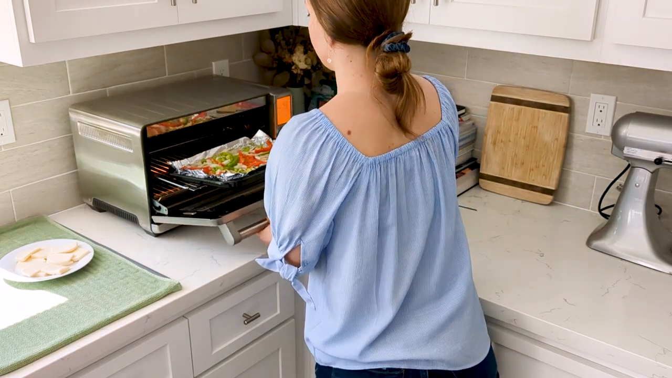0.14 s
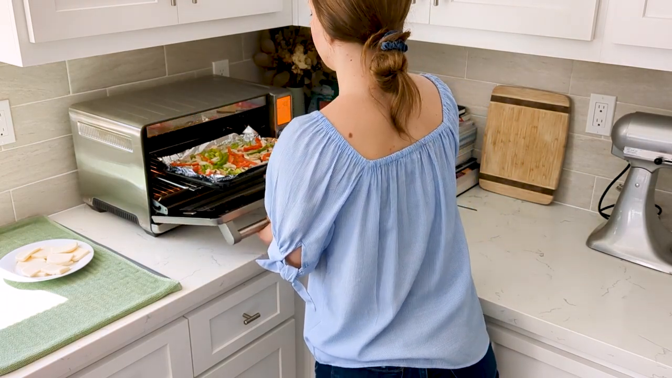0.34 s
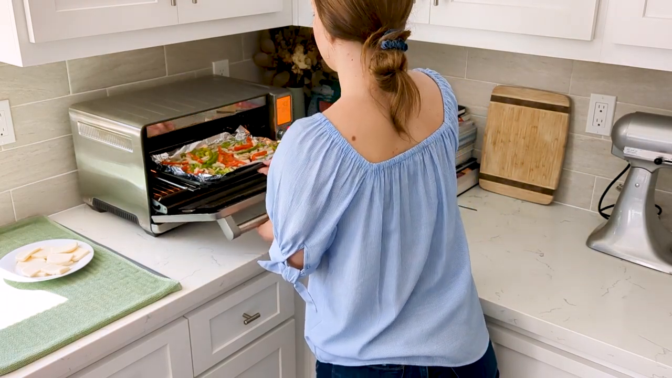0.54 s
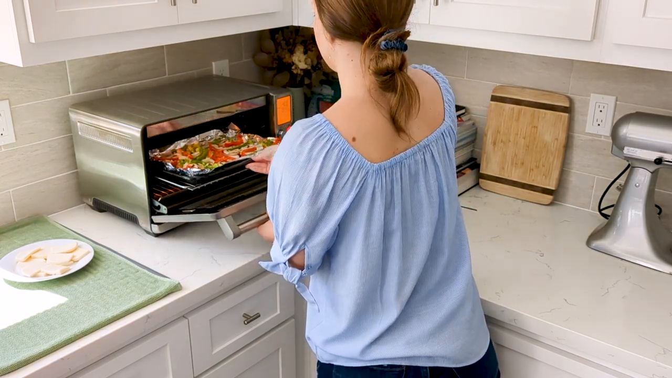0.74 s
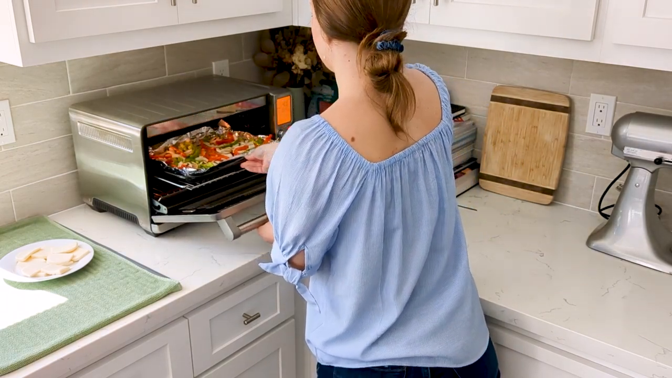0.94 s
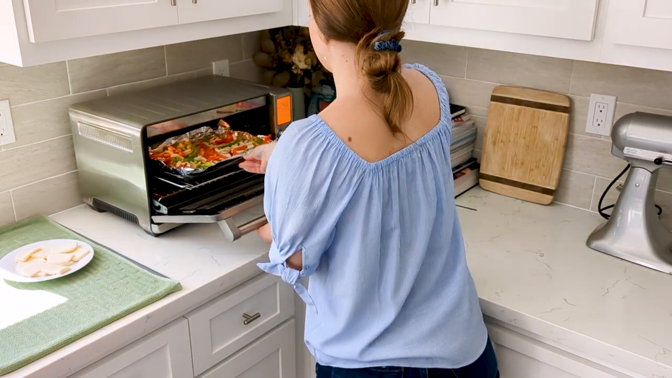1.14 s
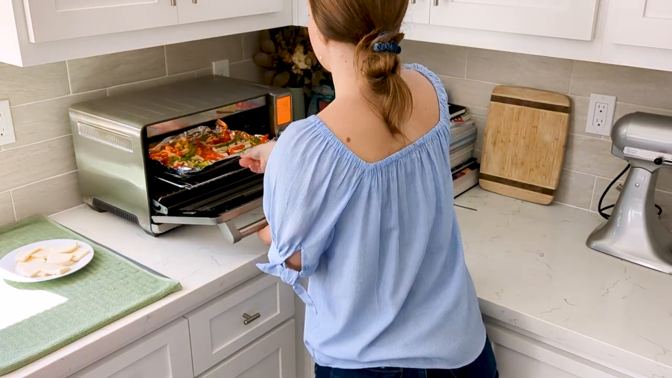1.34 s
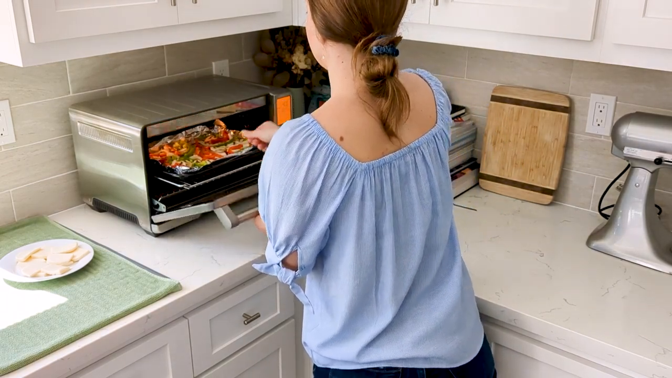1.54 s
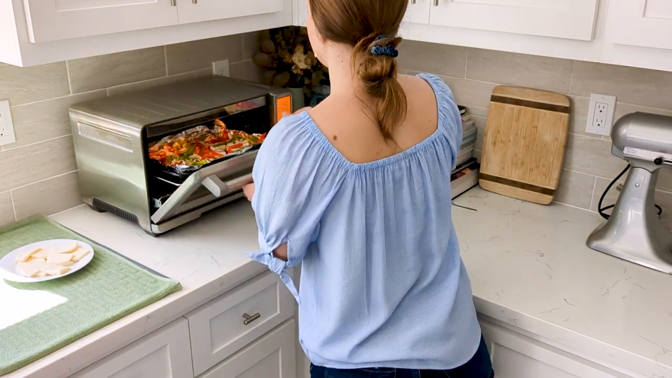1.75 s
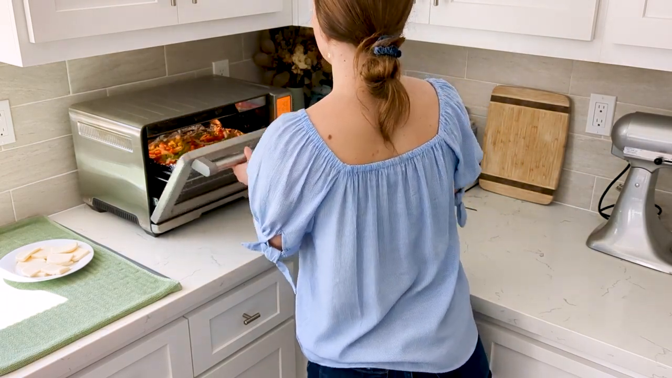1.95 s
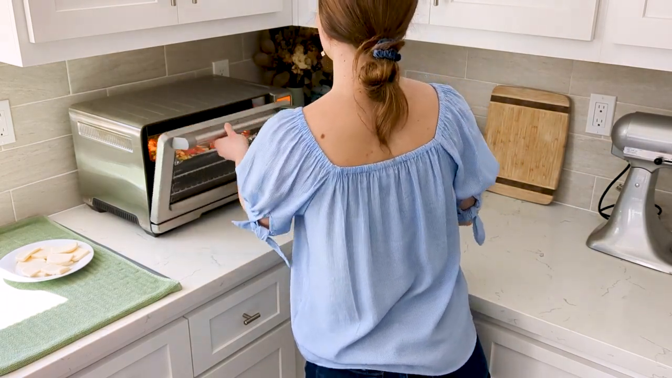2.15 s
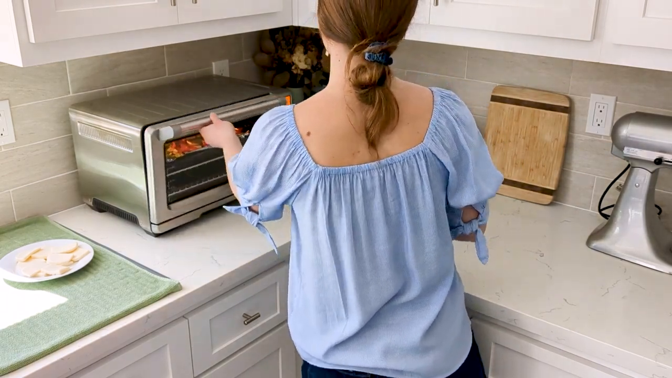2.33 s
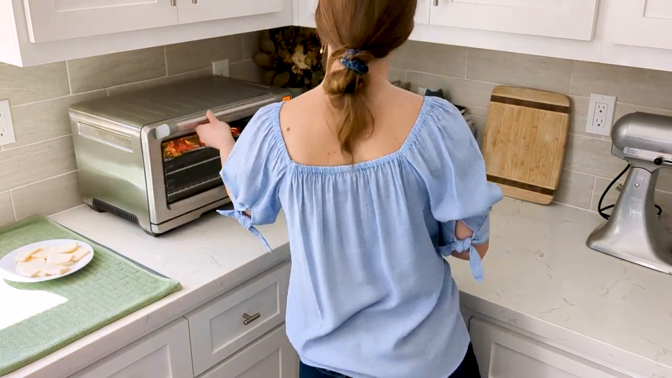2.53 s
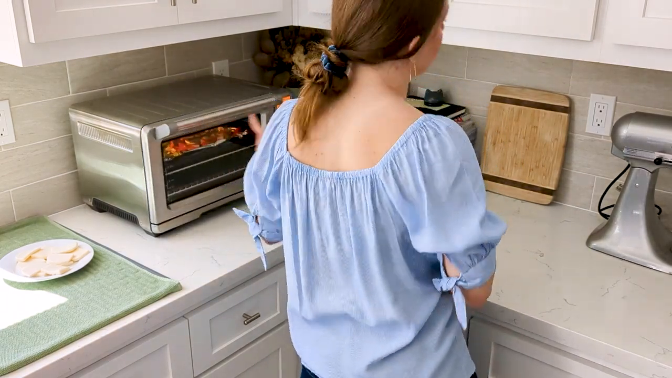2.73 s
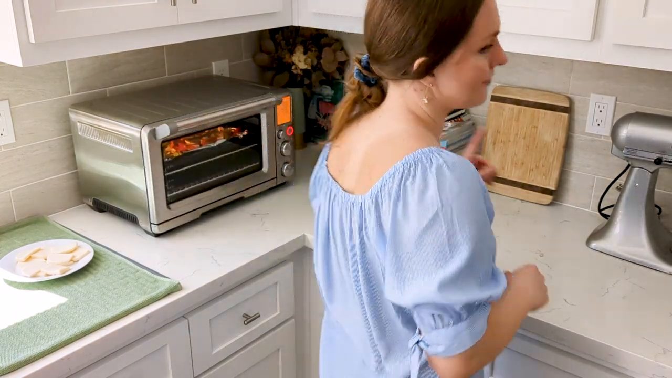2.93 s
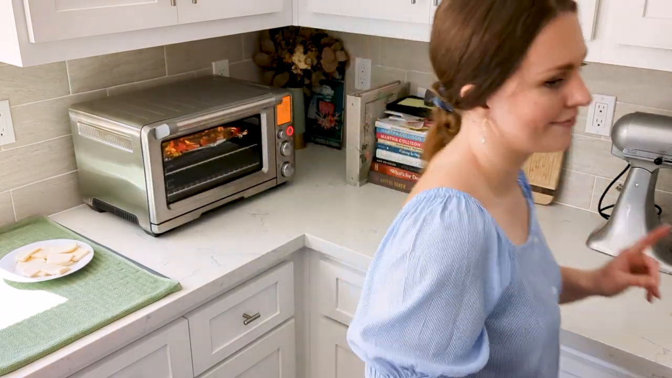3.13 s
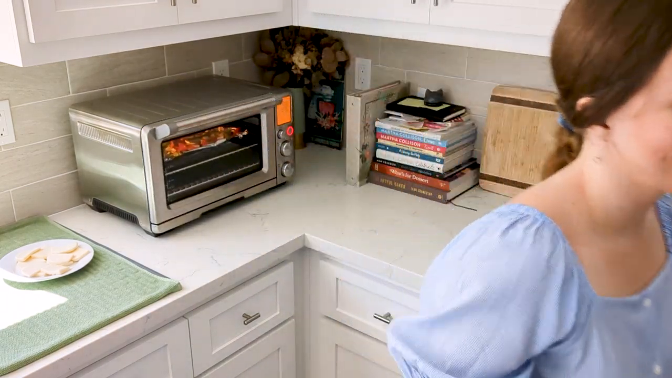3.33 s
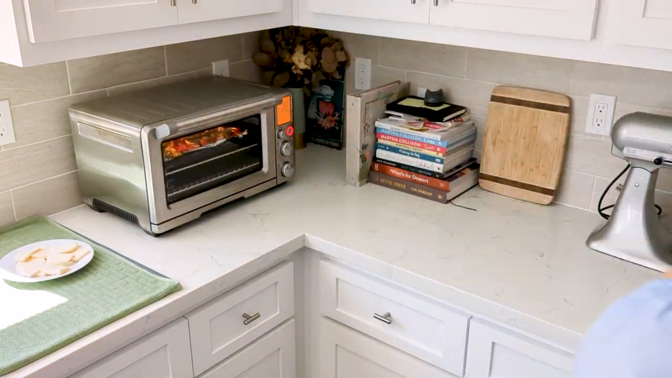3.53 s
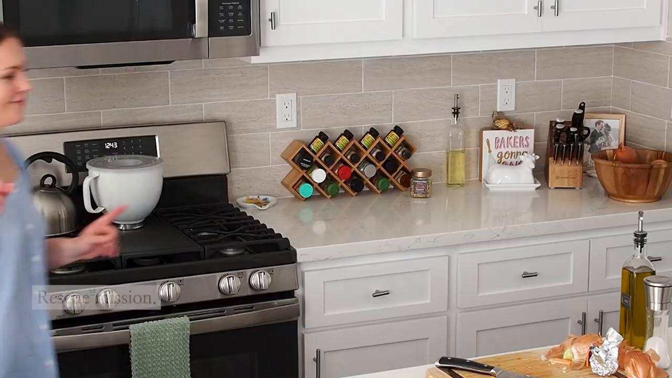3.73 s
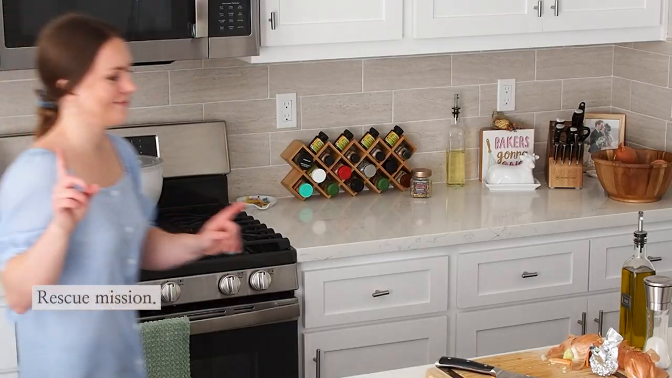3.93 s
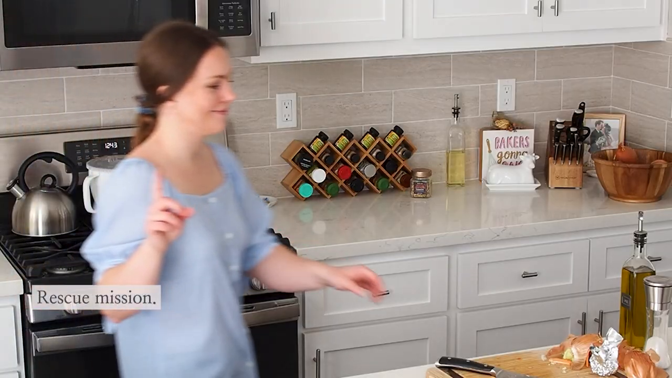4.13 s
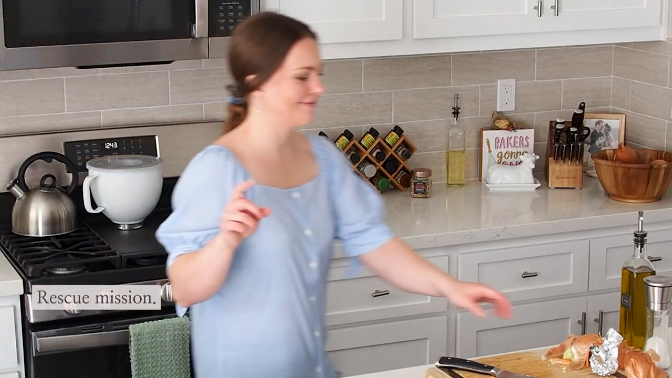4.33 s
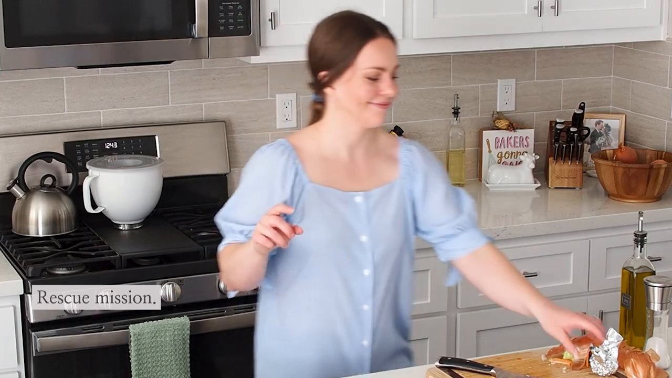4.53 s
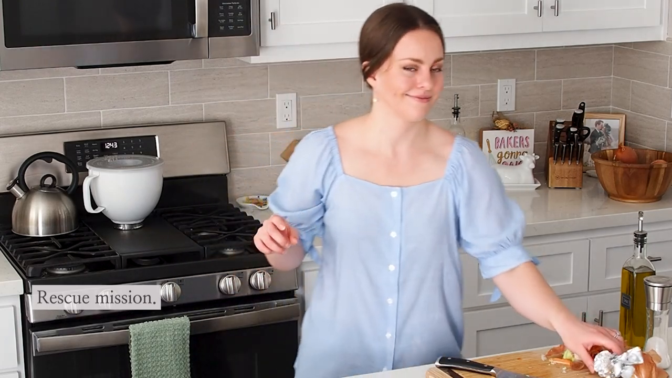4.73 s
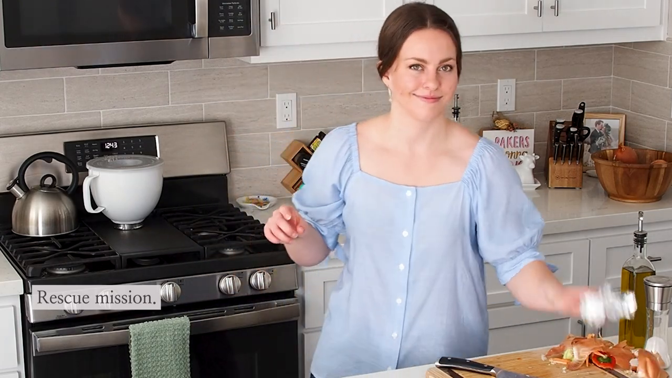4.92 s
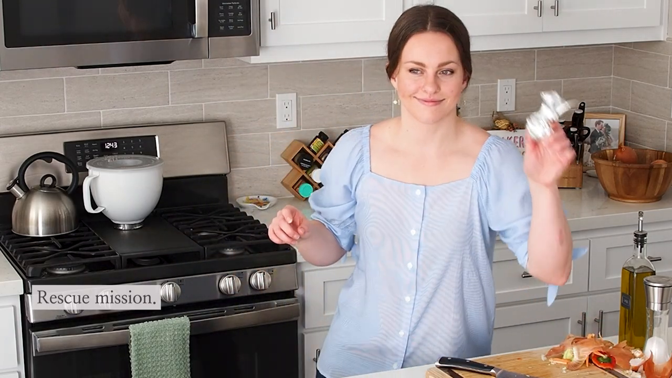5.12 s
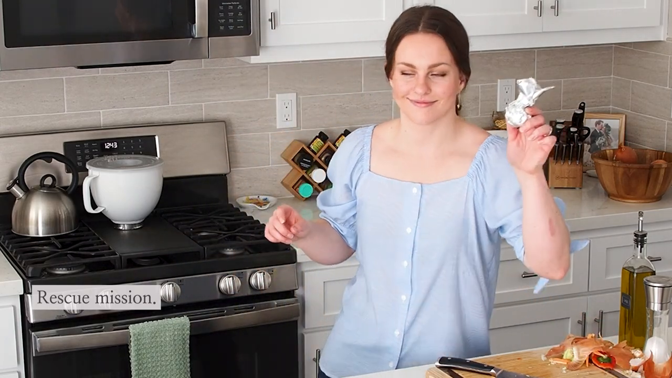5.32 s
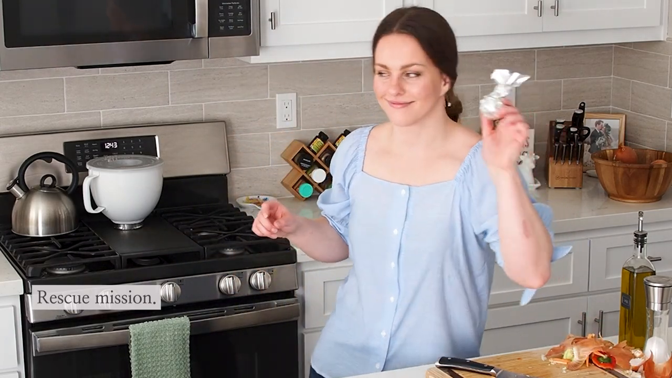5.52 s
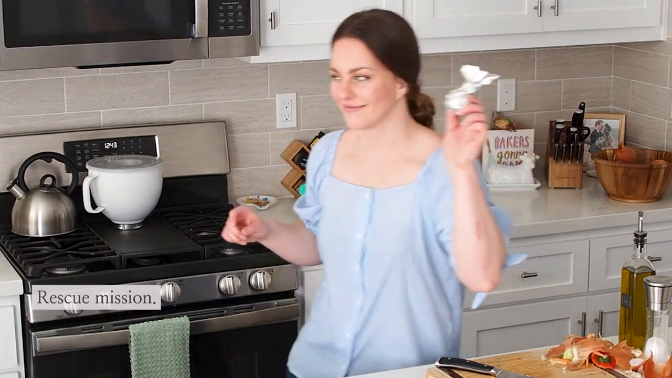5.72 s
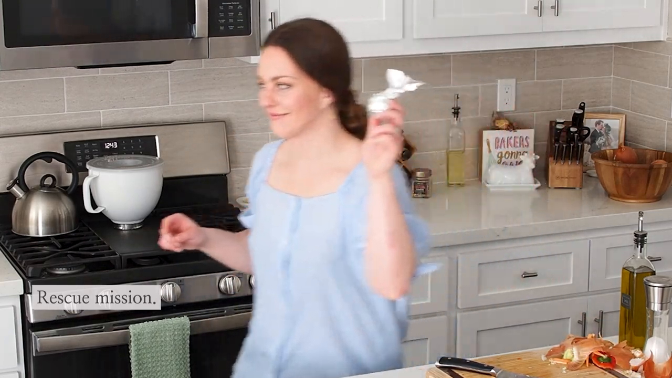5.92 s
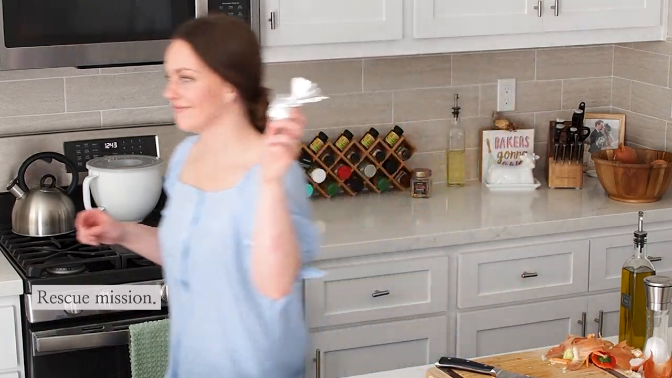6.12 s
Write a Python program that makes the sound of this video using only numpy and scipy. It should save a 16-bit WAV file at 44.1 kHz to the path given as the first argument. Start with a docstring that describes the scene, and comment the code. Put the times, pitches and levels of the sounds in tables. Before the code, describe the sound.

In a small tiled kitchen, a thin metal pan clatters and slides over oven wires near the microphone for about a second. Next the toaster oven door clanks, its hinge stutters, and it closes with a hollow thump. The rest is much quieter: low room rumble and a fan hum step up slightly, with soft swishes of cloth, a few crisp foil crackles and a dull low thud.

```python
"""Close by, a foil-lined sheet pan knocks and scrapes onto the wire rack of a toaster oven, and both ring.
The sprung door lets go with a clank, judders on its way up and shuts with a tick and a cabinet thump.
Then the microphone is by the humming stove: a sleeve rustles and a foil-wrapped lump is picked off a
board with small snaps. Behind it lie room rumble, a fan's drone and the brief echo of a tiled kitchen."""
import sys
import numpy as np
from scipy import signal
from scipy.fft import rfft, irfft, next_fast_len
from scipy.io import wavfile

SR = 44100
rng = np.random.default_rng(int(sys.argv[2]) if len(sys.argv) > 2 else 0)


def master_out(mix):
    """Clip the mix to full scale and print it as 16-bit PCM to the path in sys.argv[1]."""
    frames = np.transpose(np.atleast_2d(mix))
    ceiling = np.clip(frames, -1, 1)
    pcm = np.round(ceiling * 32767).astype(np.int16)
    wavfile.write(sys.argv[1], SR, pcm)


N = 271920
T = np.arange(N) / SR

# Levels in the tables are relative, within each layer.
# room tone by the oven and by the stove: f/Hz, level/dB
OVEN_AIR = [(12, -50), (20, 5.5), (60, -12.5), (146, -7), (177, -17), (328, -16), (434, -18.5),
            (472, -15.5), (738, -21.5), (1000, -22), (1260, -22.5), (6910, -38), (16000, -43.5)]
STOVE_AIR = [(12, -81), (20, 5), (96, -10), (146, -19.5), (177, -13.5), (337, -18.5), (485, -14),
             (738, -20.5), (1000, -17), (1290, -22.5), (1760, -22), (2600, -29.5), (16000, -44)]
# fan resonances: f/Hz, width/Hz, level by the oven/dB, level by the stove/dB
FAN_DRONE = [(138.8, 5.8, -62, -58), (336.8, 28, -64.5, -58), (486.7, 22, -67, -60.5),
             (582, 26, -69.5, -65), (1016.6, 34, -66, -59.5), (1134, 86, -66.5, -62)]
# thuds of the settling pan, the door's weight and footfalls: t/s, level/dB, length/s
THUDS = [(1.022, -42, 0.14), (2.205, -36.5, 0.088), (4.728, -42, 0.21), (5.58, -52, .1)]
# their spectrum: f/Hz, level/dB
THUD_TONE = [(20, -8), (60, 16.5), (120, 3), (220, 8), (600, -36)]

# swishes of sleeve and foil: peak t/s, level/dB, fading time/s, treble/dB
SWISHES = [(3.08, -66, 0.15, 1), (3.83, -54.5, 0.22, -3.5), (4.10, -49.5, 0.14, -4.5),
           (4.29, -47, 0.097, -6.5), (4.49, -43.5, 0.053, -1), (4.74, -50.5, 0.12, -1),
           (5.125, -47.5, 0.081, 0.5), (5.615, -62.5, .02, 10.5), (5.97, -57, 0.31, 0.5)]
# foil snaps: t/s, level/dB, treble/dB
FOIL_SNAPS = [(4.071, -66, 9), (4.6157, -34.5, 0), (4.6217, -32.5, 2.5), (4.633, -47, -6), (5.096, -57, 8),
              (5.134, -45.5, -19), (5.2236, -44, -12), (5.940, -52.5, 5.5)]
# spectra of the rubbing and of the snaps: f/Hz, level/dB
RUB_TONE = [(300, 0), (2500, -1.5), (7500, -4), (16000, -12)]
FOIL_TONE = [(100, -24), (600, -9), (1400, -6.5), (2500, 2), (4000, -0.5), (6500, -0.5), (9000, -5),
             (16000, -10)]

# door landing on its frame and rebounding: t/s, level/dB
DOOR_LANDINGS = [(2.456, -20), (2.4796, -21), (2.529, -34)]
# spring letting go, hinge arm reaching its stop: t/s, level/dB, contact/s, bass/dB
DOOR_KNOCKS = [(1.7425, -22.5, 0.0027, 0), (1.7455, -17, 0.023, -2.5), (1.772, -23.5, 0.046, 3),
               (1.828, -27.5, 0.034, -0.5), (2.124, -43, 0.0174, 19), (2.167, -42.5, 0.017, 6)]
# latch ticks, and the door rubbing dully on its frame: t/s, level/dB
LATCH_TICKS = [(2.372, -55), (2.395, -46), (2.648, -66)]
FRAME_CHAFES = [(2.215, -48.5), (2.418, -47), (2.465, -45.5), (2.534, -53)]
# modes of the booming case, and of door and shell: f/Hz, level/dB, t60/s
CABINET_MODES = [(102, -1.5, 0.073), (131, -1, 0.064), (149, -9, 0.85), (183, -17.5, 0.64),
                 (317.6, -20.5, 0.23)]
DOOR_MODES = [(192.7, -16, 0.73), (233, -18.5, 0.38), (338, -9, 0.12), (569.3, -10.5, 0.21),
              (980, -21, 0.41), (1186, -27, 0.12), (1443, -22, .4), (2454, -29, 0.18), (2775, -19, 0.16),
              (3216, -46, 0.21), (3780, -35, .25), (3830, -19, 0.076)]
# crowd of weaker sheet-metal modes in door and pan: f/Hz, level/dB
DOOR_SHEET = [(60, -6.5), (150, 2), (280, -0.5), (450, 2), (700, 1.5), (1200, 3.5), (2000, 0.5),
              (3600, 0.5), (5000, -7), (8000, -11.5), (10000, -17), (13000, -26), (16000, -32)]
PAN_SHEET = [(70, -5), (150, -14), (240, 1.5), (450, -2), (700, -0.5), (1200, 0), (2000, 3), (3600, 1.5),
             (5000, -3.5), (8000, -8), (10000, -13.5), (13000, -22.5), (16000, -27)]

# pan set down on the rack and stopping at its back: t/s, level/dB, contact/s, bass/dB
PAN_KNOCKS = [(0.001, -40.5, 0.013, 22.5), (0.037, -30.5, 0.0065, -20), (0.052, -27.5, 0.053, -24),
              (0.149, -40.5, 0.028, 16.5), (0.3411, -20.5, 0.014, 8), (0.369, -21, 0.02, 3),
              (0.419, -22, 0.022, 1), (0.525, -33, 0.013, -9), (0.561, -23.5, 0.023, 4),
              (0.923, -31.5, 0.033, 1)]
# pan sliding over the wires: t/s, level/dB
PAN_SLIDE = [(0, -32), (.14, -35.5), (.53, -35), (.62, -26), (.76, -33), (.86, -31), (.97, -33.5),
             (1.06, -56), (1.4, -59)]
# hollow spectrum of the pan dropping onto the rack: f/Hz, level/dB
DROP_TONE = [(300, -17.5), (470, -19), (570, 2), (760, -5.5), (950, -8), (1500, -12.5), (2500, -48)]
# modes of pan and rack together, and of the bare wires: f/Hz, level/dB, t60/s
PAN_MODES = [(116.2, -19.5, 3), (188.5, -16, 0.59), (376, -21, 0.12), (558, -19.5, 0.6), (598, -21, 0.42),
             (700, -30, 0.14), (825, -25.5, 0.51), (1214, -17, 0.78), (1440, -20, 0.85), (2180, -17, 0.64),
             (2740, -12, 0.051), (3260, -16, 0.2), (3660, -20, 0.204), (3880, -19, 0.12), (5300, -24, 0.19)]
RACK_MODES = [(3080, -14, 0.77), (3730, -2, 0.15), (5040, -13, 0.29)]


def amp(db):
    """Decibels to gain."""
    return 10 ** (np.asarray(db) / 20)


def unit(x):
    """Scale to energy 1."""
    return x / np.sqrt(np.sum(x ** 2))


def fade(t60):
    """One second of exponential decay."""
    return np.exp(-np.log(1000) * T[:SR] / t60)


def through(x, response):
    """Sound x passed through an impulse response."""
    return signal.fftconvolve(x, response)[:N]


def colour(x, points):
    """Minimum-phase filter with a spectrum given as f/Hz, level/dB."""
    size = next_fast_len(len(x) + SR // 4)
    hz, db = np.transpose(points)
    log_f = np.log(np.fft.rfftfreq(size, 1 / SR) + 1)
    log_gain = np.log(amp(np.interp(log_f, np.log(hz), db)))
    cepstrum = irfft(log_gain, size)
    cepstrum[1:size // 2] *= 2
    cepstrum[size // 2 + 1:] = 0
    return irfft(rfft(x, size) * np.exp(rfft(cepstrum)), size)[:len(x)]


def shelves(x, bass_db, treble_db, bass_hz=800, treble_hz=5000):
    """Heavy contacts push more bass into a body, sharp ones more treble."""
    f, spectrum = np.fft.rfftfreq(len(x), 1 / SR), rfft(x)
    low = irfft(spectrum / (1 + (f / bass_hz) ** 4), len(x))
    high = x - irfft(spectrum / (1 + (f / treble_hz) ** 4), len(x))
    return x + (amp(bass_db) - 1) * low + (amp(treble_db) - 1) * high


def whiten(x, length_s):
    """Flatten a burst's spectrum so that it has no pitch, keeping it within about length_s."""
    window = np.exp(-(T[:len(x)] / length_s) ** 8)
    for _ in range(3):
        x = irfft(np.exp(1j * np.angle(rfft(x))), len(x)) * window
    return unit(x)


def wash(t60_low, t60_high):
    """Countless overlapping resonances; losses grow with frequency, so the treble dies first."""
    centres_hz = np.geomspace(500, 16000, 6)
    f, noise = np.fft.rfftfreq(SR, 1 / SR), rfft(rng.standard_normal(SR))
    t60s = 1 / np.interp(centres_hz, [0, centres_hz[-1]], [1 / t60_low, 1 / t60_high])
    bands = [irfft(noise * np.interp(f, centres_hz, pick), SR) for pick in np.eye(len(centres_hz))]
    tail = sum(band * unit(fade(t60)) for band, t60 in zip(bands, t60s))
    return whiten(tail, length_s=0.47)


def body(tone, t60_low, t60_high):
    """Impulse response of a body with dense resonances and the given spectrum."""
    return unit(colour(wash(t60_low, t60_high), tone))


def ring(modes):
    """Impulse response of decaying modes, alternating in sign."""
    return sum((-1) ** k * amp(db) * unit(fade(t60) * np.sin(2 * np.pi * hz * T[:SR]))
               for k, (hz, db, t60) in enumerate(modes))


def shifting(x, make_response, count=5, turn_hz=22):
    """A moving source meets changing responses: fade from one to the next, round and round."""
    out = 0
    for k in range(count):
        turns_away = np.abs((T * turn_hz - k + count / 2) % count - count / 2)
        share = np.cos(np.pi / 2 * np.minimum(turns_away, 1))
        out = out + through(x * share, make_response())
    return out


def grit(count, spread_db):
    """Tiny contacts of unequal size, rms 1."""
    sizes = rng.standard_normal(count) * amp(spread_db * np.clip(rng.standard_normal(count), -2, 2))
    return unit(sizes) * np.sqrt(count)


def blows(rows, spread_db, bass_hz=800):
    """Each blow is a short buzz of contacts: t/s, level/dB, contact/s, bass/dB, treble/dB."""
    force, t, lead = np.zeros(N + SR), T[:SR // 4], SR // 100
    for s, db, length, bass_db, treble_db in rows:
        buzz = grit(len(t), spread_db) * np.exp(-(t / length) ** 4)
        buzz = whiten(buzz, 1.5 * length) * np.sqrt(.03 * SR)  # energy of 30 ms at rms 1
        buzz = shelves(np.pad(buzz, (lead, 0)), bass_db, treble_db, bass_hz)
        start = int(s * SR)
        force[start:start + len(buzz)] += amp(db) * buzz
    return force[lead:lead + N]


def judder(start_s, gap_s, slowing, db, fall_db, length_s,
           bass_db, bass_gain_db, treble_db, treble_loss_db, count):
    """Rows of blows for stick and slip running down: the jolts get sparser, weaker and duller."""
    k = np.arange(count)
    gaps = gap_s * slowing ** k
    onsets = start_s + np.cumsum(gaps) - gaps
    return np.transpose([onsets, db - fall_db * k, np.full(count, length_s),
                         bass_db + bass_gain_db * k, treble_db - treble_loss_db * k])


def room_tone(stove_from_s=3.735):
    """Rumble and a fan's narrow air resonances; both step up once the microphone is by the stove."""
    def rumble(tone, rms_db):
        return amp(rms_db) * unit(colour(rng.standard_normal(N), tone)) * np.sqrt(N)
    by_stove = np.clip((T - stove_from_s) / 0.01, 0, 1)
    air = (1 - by_stove) * rumble(OVEN_AIR, rms_db=-53) + by_stove * rumble(STOVE_AIR, rms_db=-47.5)
    f = np.fft.rfftfreq(N, 1 / SR)
    for hz, width, oven_db, stove_db in FAN_DRONE:
        hum = irfft(rfft(rng.standard_normal(N)) / (1 + ((f - hz) / (width / 2)) ** 2), N)
        air += unit(hum) * np.sqrt(N) * amp(oven_db + by_stove * (stove_db - oven_db))
    return air


def kitchen():
    """Response of the tiled walls, reaching the microphone about 7 ms after the direct sound."""
    return np.pad(wash(t60_low=0.99, t60_high=0.2), (SR // 150, 0))


def thuds():
    """Soft weight on counter and floor: only the bass reaches the microphone."""
    force = blows([(*row, 0, 0) for row in THUDS], spread_db=5)
    return through(force, unit(colour(fade(.001), THUD_TONE)))


def sleeve(rise_share=0.55):
    """Each move of an arm rubs cloth and foil: a stream of tiny contacts swells and fades."""
    force, t = np.zeros(N + SR), T[:SR] - .5
    for s, db, fading, treble_db in SWISHES:
        swell = np.exp(-np.abs(t) / np.where(t < 0, rise_share * fading, fading))
        contacts = grit(SR, spread_db=12.5) * amp(db) * swell
        start = int((s + t[0]) * SR)
        force[start:start + SR] += shelves(contacts, 0, treble_db)
    return through(force[:N], body(RUB_TONE, t60_low=0.027, t60_high=0.015))


def foil(snap_s=0.0018, bass_db=3):
    """Dry foil snaps reach the microphone directly and scattered by the counter."""
    def scatter():
        paths = amp(0.5) * wash(t60_low=0.16, t60_high=0.056)
        paths[0] += 1  # the direct path
        return unit(colour(whiten(paths, length_s=0.11), FOIL_TONE))
    snaps = [(s, db, snap_s, bass_db, treble_db) for s, db, treble_db in FOIL_SNAPS]
    return shifting(blows(snaps, spread_db=6.5), scatter, count=3)


def cabinet():
    """The door lands on its frame and the whole case booms."""
    pushes = np.zeros(N)
    for s, db in DOOR_LANDINGS:
        pushes[int(s * SR)] += amp(db) * np.sqrt(.03 * SR)
    swing_up = 1 - fade(0.074)  # the panels take a moment to move
    return through(pushes, ring(CABINET_MODES) * swing_up)


def door(knock_treble_db=5.5):
    """The spring lets go with a clank, the hinge judders, the door rubs home and the latch ticks."""
    knocks = [(*row, knock_treble_db) for row in DOOR_KNOCKS]
    hinge = judder(start_s=1.868, gap_s=.058, slowing=1.05, db=-24.5, fall_db=4.5, length_s=0.024,
                   bass_db=4, bass_gain_db=3.5, treble_db=4.5, treble_loss_db=0.5, count=4)
    sharp, dull = (.005, -3, 10.5), (.035, 17, -3)  # contact/s, bass/dB, treble/dB
    ticks = [(*row, *sharp) for row in LATCH_TICKS]
    chafes = [(*row, *dull) for row in FRAME_CHAFES]
    force = blows([*knocks, *hinge, *ticks, *chafes], spread_db=5, bass_hz=680)
    sheet = shifting(force, lambda: body(DOOR_SHEET, t60_low=0.172, t60_high=0.065))
    return amp(-3) * sheet + amp(-5) * through(force, ring(DOOR_MODES))


def scrape(bass_db_per_s=14):
    """Force of the pan sliding over the wires; the bass grows as the rack takes the weight."""
    times, levels_db = np.transpose(PAN_SLIDE)
    end_s = times[-1]
    pressure = amp(np.interp(T, times, levels_db)) * (T < end_s)
    bass_db = 0.5 + bass_db_per_s * np.minimum(T, end_s)
    return shelves(grit(N, spread_db=9) * pressure, bass_db, treble_db=0)


def pan(knock_treble_db=7, rack_loaded_s=0.39):
    """Sharp metal knocks and scraping ring the thin pan and its rack; the contact points keep moving."""
    knocks = [(*row, knock_treble_db) for row in PAN_KNOCKS]
    jolts = judder(start_s=.586, gap_s=.056, slowing=1.13, db=-19.5, fall_db=1.5, length_s=0.0155,
                   bass_db=-17, bass_gain_db=4.5, treble_db=7.5, treble_loss_db=0.95, count=5)
    force = scrape() + blows([*knocks, *jolts], spread_db=9)
    sheet = shifting(force, lambda: body(PAN_SHEET, t60_low=0.1107, t60_high=0.097))
    drop = blows([(.5585, -21, 0.0427, 0, 0)], spread_db=-0.5)  # the pan drops onto the rack
    hollow_knock = through(drop, body(DROP_TONE, t60_low=0.085, t60_high=0.017))
    rack_db = np.where(T < rack_loaded_s, -16.5, -33)  # the pan's weight quiets the wires
    rack = through(force * amp(rack_db), ring(RACK_MODES))
    return amp(-4.5) * sheet + amp(-6.5) * through(force, ring(PAN_MODES)) + rack + hollow_knock


def scene():
    """Oven and hands near one microphone in a small, hard room whose echoes change as the cook moves."""
    oven = pan() + door()
    thump = cabinet()
    hands = sleeve() + foil()
    to_walls = amp(-5) * oven + amp(-11) * hands + amp(-8.5) * thump
    echo = shifting(to_walls, kitchen, count=4, turn_hz=12)
    return (amp(1) * oven + thump + hands + thuds() + echo + room_tone())[None]


def record(dry):
    """The recorder cuts the top steeply."""
    top_hz = 15900
    return signal.sosfilt(signal.ellip(10, .2, 80, top_hz, fs=SR, output="sos"), dry)


dry = scene()
out = record(dry)
master_out(out)
```